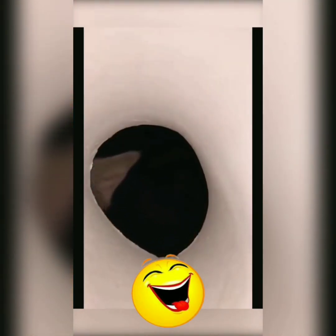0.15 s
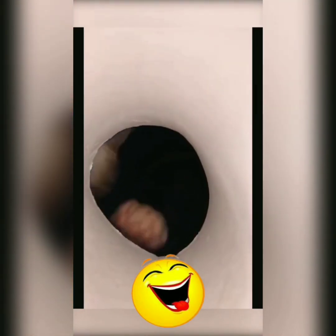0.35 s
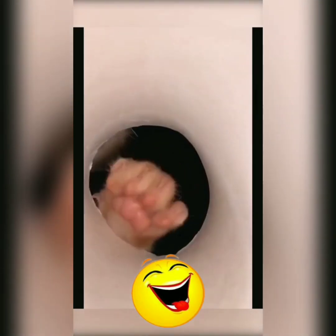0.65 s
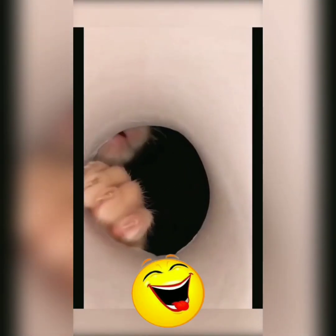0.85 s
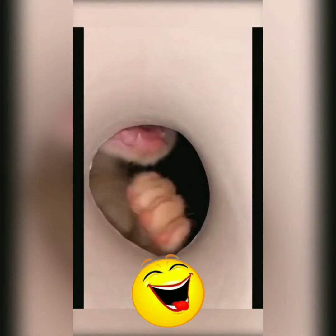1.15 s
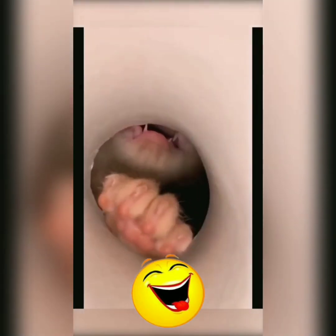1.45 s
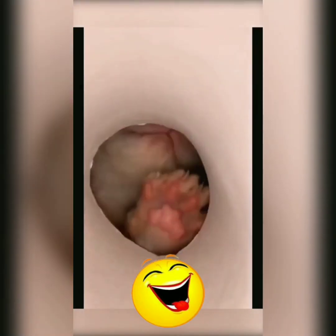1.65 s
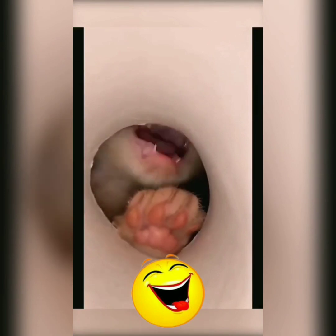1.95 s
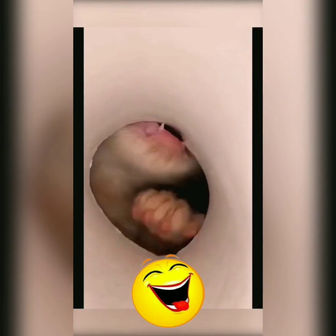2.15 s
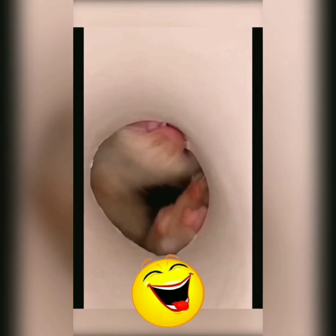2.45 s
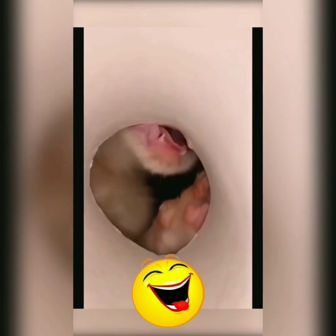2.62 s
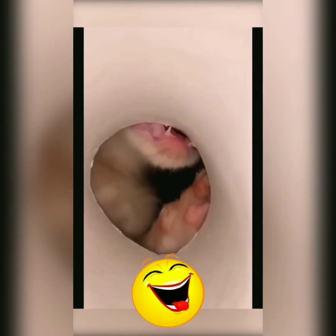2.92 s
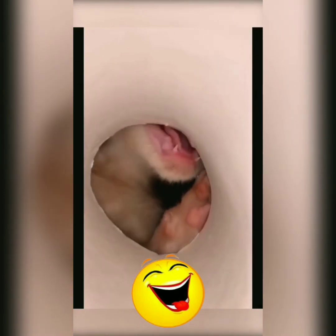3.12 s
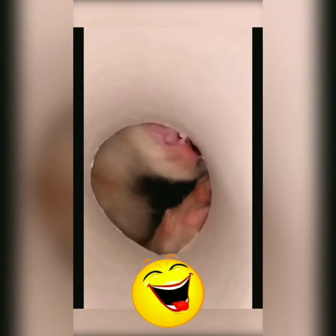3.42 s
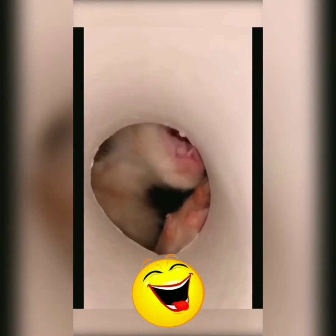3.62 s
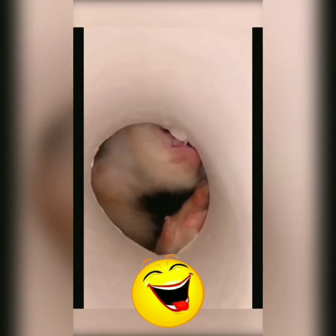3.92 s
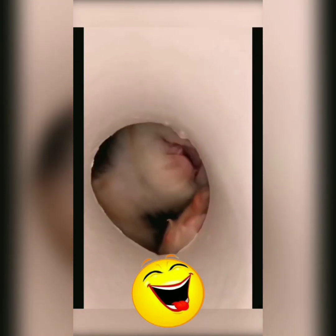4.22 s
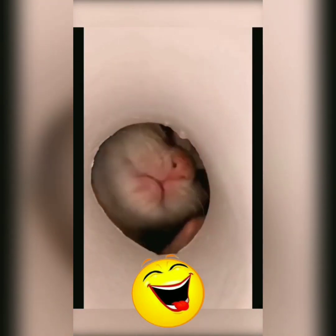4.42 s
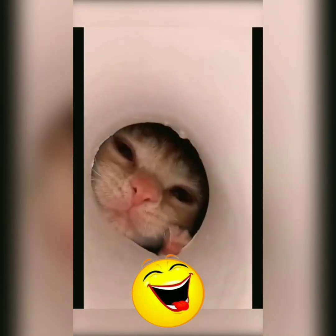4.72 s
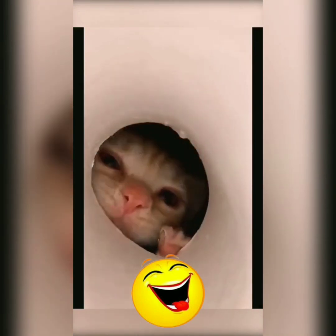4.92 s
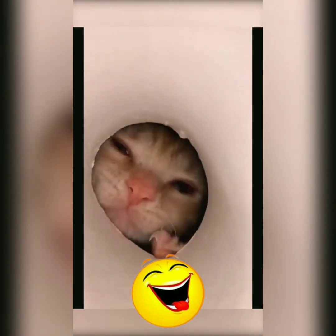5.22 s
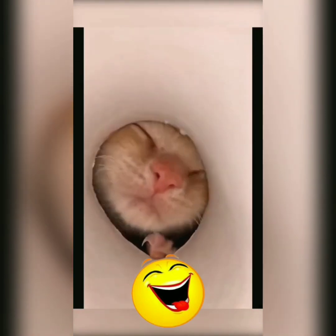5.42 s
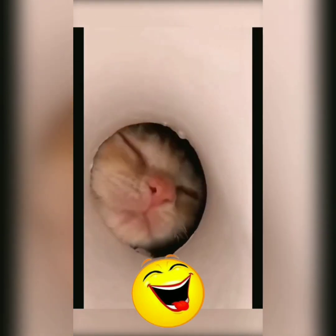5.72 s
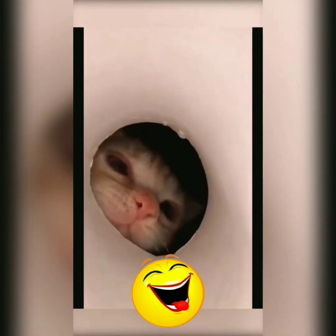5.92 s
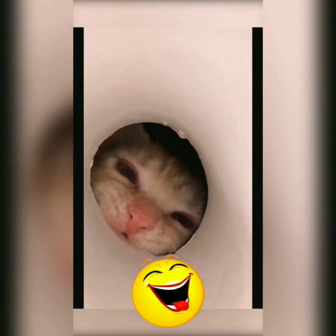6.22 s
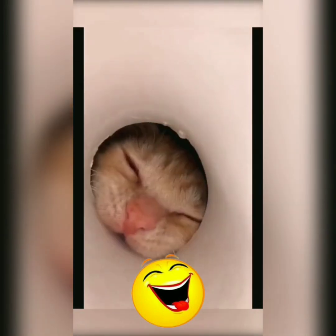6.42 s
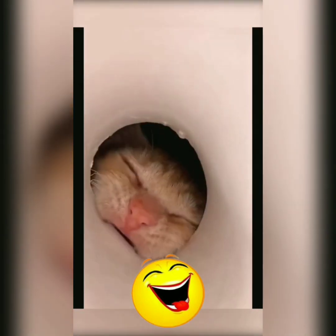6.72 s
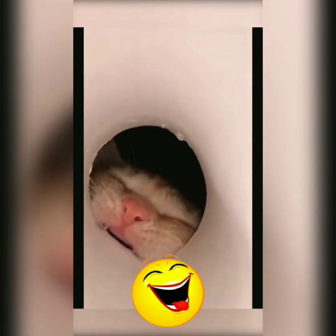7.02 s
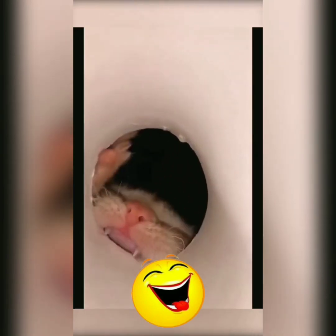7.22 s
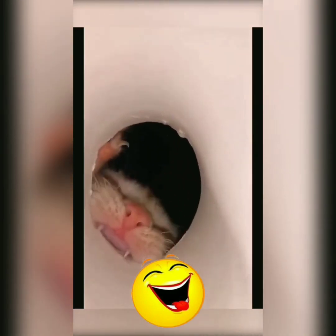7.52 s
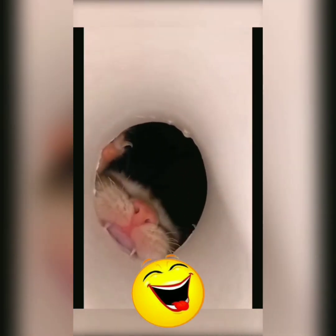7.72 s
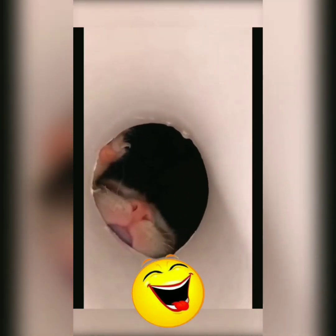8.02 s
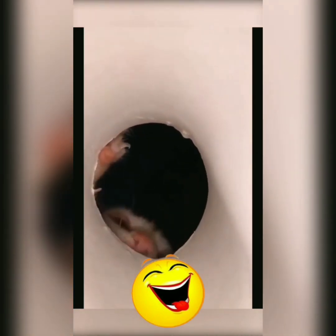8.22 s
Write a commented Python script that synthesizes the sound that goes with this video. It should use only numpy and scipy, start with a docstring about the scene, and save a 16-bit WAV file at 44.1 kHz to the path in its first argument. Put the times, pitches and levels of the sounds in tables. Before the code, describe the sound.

A dry, close stereo perspective in a nearly silent room, leaning right. A faint short rub opens; at 0.3 seconds the first snap clicks from stiff paper, followed by scattered light ticks and soft scraping. From 1.0 to 1.7 teeth catch harder, with rapid crunches and strong snaps around 1.5 to 1.65. Another tight pair cracks near 2.05. From 2.3 to 3.8 it is quieter: small clicks, fur hissing on the edge, dull soft bumps. A loud, low snap bursts at 3.98, with more until 4.15, then a crunch at 4.6. Around 5 there are mostly gentle strokes and bumps. Crisp snaps land at 5.7, 5.87, 6.3 and 6.4, with grainy rubbing between. A hard double snap hits at 7.2, another at 7.56, then gritty scraping at 7.7 and a quick flurry from 7.9 to 8.22, before faint rubbing ends it.

```python
"""A faint short rub in a quiet room, then sharp snaps: a kitten bites and claws at the edge of a hole
in a sheet of stiff paper, close to the microphone. Teeth and claws catch and slip off; each snap runs
through the sheet as a bending wave, treble first, bass last. A dragged tooth sticks and slips in a short
crunch. Between the snaps fur, muzzle and paws rub along the edge in short strokes with a grainy hiss and
small crackles, the sheet flexes with a low rumble, and soft pads and muzzle bump it dully."""
import sys
import numpy as np
from scipy import signal
from scipy.fft import rfft, irfft, next_fast_len
from scipy.io import wavfile
from scipy.ndimage import uniform_filter1d

SR = 44100
rng = np.random.default_rng(int(sys.argv[2]) if len(sys.argv) > 2 else 0)


def dump(signal):
    """Clip the signal to [-1, 1] and save it as 16-bit WAV at the path in sys.argv[1]."""
    limited = np.clip(np.atleast_2d(signal).T, -1, 1)
    pcm = np.round(limited * 32767).astype(np.int16)
    wavfile.write(sys.argv[1], SR, pcm)


N = 368676

# colour of the sheet's middle range, only its shape counts: (frequency [Hz], level [dB])
SHEET_COLOUR = [(250, -29), (340, -8.5), (430, -0.5), (800, -2.5), (1000, 2), (1250, -4), (1750, -11),
                (2530, -7.5), (3000, -17.5), (4000, -69)]
# colour of the cracking and hissing paper fibres: (frequency [Hz], level [dB])
FIBRE_COLOUR = [(2200, -42), (3200, -6), (4500, -2.5), (5030, 2), (5600, -4.5), (6300, -2.5), (7300, 0.5),
                (9200, -6.5), (11500, -0.5), (12300, 4), (13100, -11), (15500, -34)]
# colour of the sheet's slow flexing: (frequency [Hz], level [dB])
BENDING_COLOUR = [(22, -19), (60, 4.5), (225, 4.5), (290, 0.5), (350, -10.5), (600, -45)]
# how alike the two microphone ports hear snaps and crunches: (frequency [Hz], likeness [0-1])
SNAP_ALIKE = [(100, 0.78), (600, 0.43), (9000, 0.97)]

SNAP_SIZE, LEAD_SIZE = 4096, 768   # samples in one snap, and those ahead of its release
CREEP_S = 0.003   # time in which creeping and tearing grow or fade by a factor e
TRAVEL_S = 0.002115   # delay of bending waves at 1 kHz


def from_db(db):
    """Decibels to gain."""
    return 10 ** (np.asarray(db) / 20)


def rms_one(x):
    """Scale to rms 1."""
    return x / np.sqrt(np.mean(np.abs(x) ** 2) + 1e-20)


def in_time(rows):
    """Each column of a curve at every sample."""
    s, *columns = np.transpose(rows)
    return [np.interp(np.arange(N) / SR, s, c) for c in columns]


def bins(size):
    """Frequencies of a spectrum, kept above zero."""
    return np.maximum(np.fft.rfftfreq(size, 1 / SR), 1)


def at_hz(points, hz):
    """Read a table on a log-frequency axis."""
    f, value = np.transpose(points)
    return np.interp(np.log(hz), np.log(f), value)


def wander(shape, *spans):
    """Smooth random field of rms 1 that holds over the given number of steps along each axis."""
    field = rng.standard_normal(shape)
    for axis, span in enumerate(spans):
        steps = shape[axis]
        blur = np.exp(-(np.pi * np.fft.rfftfreq(steps) * span) ** 2)
        spectrum = rfft(np.swapaxes(field, axis, -1))
        field = np.swapaxes(irfft(spectrum * blur, steps), axis, -1)
    return rms_one(field)


def causal(db):
    """Minimum-phase response with this colour and unit power: nothing rings before its cause."""
    cepstrum = irfft(np.log(from_db(db)))
    half = len(cepstrum) // 2
    cepstrum[1:half] *= 2
    cepstrum[half + 1:] = 0
    return rms_one(np.exp(rfft(cepstrum)))


def ports(common, apart, likeness, hz, share=1):
    """Left and right spectra; the right port faces the sheet and hears its middle range louder."""
    # balance of the two microphone ports: (frequency [Hz], left minus right [dB])
    port_balance = [(380, 0.6), (650, -11), (2400, -8.5), (7000, -0.2)]
    alike = np.clip(at_hz(likeness, hz), 0, 1)
    sides = np.array([[1], [-1]])
    lean = from_db(sides * share * at_hz(port_balance, hz) / 2)
    apart = apart * np.sqrt((1 - alike) / (1 + alike))
    return (common + sides * apart) * lean / lean.mean(axis=0)


def travel(hz):
    """Bending waves travel as the root of frequency: treble arrives first, bass last."""
    return np.exp(-4j * np.pi * TRAVEL_S * np.sqrt(1000 * hz))


def air(level_db=-78.5):
    """The faint, slightly dull noise of the quiet room."""
    noise = uniform_filter1d(rng.standard_normal((2, N)), size=3)
    return from_db(level_db) * rms_one(noise)


def bumps(pad_hz=300, width_hz=260, length_s=0.0096):
    """Soft pads and muzzle press on the sheet: a dull swell of one low resonance, without any crack."""
    # soft bumps of paw or muzzle: (middle [s], level at the middle [dB])
    soft_bumps = [(2.616, -41), (3.056, -50), (3.114, -48), (5.031, -44.5), (5.688, -40.5), (6.773, -41)]
    t, hz = np.arange(N) / SR, bins(N)
    push = sum(from_db(db) * np.exp(-((t - s) / length_s) ** 2 / 2) for s, db in soft_bumps)
    resonance = 1 / (1 + 2j * (hz - pad_hz) / width_hz) ** 2
    ringing = rms_one(irfft(rfft(rng.standard_normal(N)) * resonance, N))
    return push * ringing * from_db([[1.5], [-1.5]])   # louder on the left


def contact():
    """Levels of scrape, hiss and rumble at every sample, in dB: the strokes on top of the leaning."""
    # between strokes the kitten leans on the sheet and its fur keeps stirring: (time [s], scrape [dB])
    leaning_levels = [(0.27, -110), (0.31, -60), (0.9, -60), (2.2, -50), (2.52, -67.5), (2.8, -63),
                      (4.3, -62.5), (4.55, -54.5), (4.82, -68.5), (4.93, -55), (6.05, -57), (6.9, -58),
                      (7.4, -66), (7.62, -51.5), (8.3, -59)]
    # a claw, tooth or cheek is drawn along the edge, levels at half length:
    # (half risen at [s], length [s], scrape [dB], hiss [dB], rumble [dB])
    edge_strokes = [(0.019, 0.029, -48, -46, -56.5), (0.299, 0.085, -49, -58, -86),
                    (0.478, 0.12, -55.5, -55, -61), (0.78, 0.16, -51.5, -52.5, -61),
                    (0.97, 0.18, -58, -52.5, -55), (1.28, 0.041, -48, -53.5, -51),
                    (1.342, 0.12, -45, -56, -42), (1.538, 0.13, -46.5, -50.5, -50),
                    (1.728, 0.059, -45, -48, -45), (1.825, 0.13, -54.5, -52.5, -51.5),
                    (2.006, 0.051, -38, -47, -37.5), (2.252, 0.059, -49.5, -40, -56),
                    (2.579, 0.029, -48, -50, -68), (2.656, 0.033, -43, -50, -47),
                    (3.023, 0.027, -51, -52, -59), (3.342, 0.12, -49.5, -46.5, -59),
                    (3.395, 0.12, -42, -44.5, -42.5), (3.641, 0.043, -51.5, -53, -57),
                    (4.408, 0.086, -44.5, -53, -62), (4.6, .115, -43, -49.5, -56.5),
                    (4.976, 0.25, -56, -60, -72), (5.21, 0.11, -41.5, -49.5, -49.5),
                    (5.336, 0.1, -48, -49, -54), (5.464, 0.19, -59.5, -47.5, -66),
                    (5.791, 0.11, -48.5, -64, -59), (6.171, 0.064, -53.5, -53.5, -74),
                    (6.303, 0.17, -37.5, -43, -49.5), (6.655, 0.12, -49, -46.5, -54.5),
                    (6.928, 0.042, -44, -47.5, -50), (6.984, 0.069, -43.5, -39.5, -78),
                    (7.195, 0.11, -41, -51, -42), (7.518, 0.083, -42.5, -54.5, -47.5),
                    (7.715, 0.016, -32, -30, -50), (7.74, 0.011, -28, -33.5, -39.5),
                    (7.892, 0.031, -35, -42, -35.5), (8.04, 0.14, -49, -58.5, -53.5),
                    (8.32, 0.016, -49, -77, -46)]
    attack_share = 0.42   # of its length: long strokes swell slowly
    sag_db_per_s, release_db_per_s = 33, 456   # through the stroke, and in addition after its length
    leaning_hiss_db, leaning_rumble_db = -3.5, -7   # relative to the leaning scrape
    t = np.arange(N) / SR
    leaning_db, = in_time(leaning_levels)
    power = from_db(leaning_db + np.array([[0], [leaning_hiss_db], [leaning_rumble_db]])) ** 2
    for s, length, *levels_db in edge_strokes:
        attack = attack_share * length
        near = slice(max(int((s - attack / 2) * SR), 0), int((s + length + .5) * SR))
        age = t[near] - s
        hold = np.clip(age / attack + .5, 0, 1)
        sag_db = sag_db_per_s * (age - length / 2)
        fade_db = sag_db + release_db_per_s * np.maximum(age - length, 0)
        power[:, near] += np.outer(from_db(levels_db), hold * from_db(-fade_db)) ** 2
    return 10 * np.log10(power)


def friction(colour_db, level_db, per_s, spread_db, smooth, judder_db, judder_s):
    """Tiny catches of fibres, uneven in size, over a smooth sliding noise; both ring in the sheet."""
    # how alike the two microphone ports hear the rubbing: (frequency [Hz], likeness [0-1])
    rub_alike = [(60, 0.55), (400, 0.13), (6500, 0.2), (12000, 0.72)]
    size = 2 * next_fast_len(N // 2 + SNAP_SIZE)
    caught = rng.random(N) < per_s / SR
    grains = rms_one(caught * from_db(spread_db * np.minimum(rng.exponential(1, N), 4)))
    # the contact sticks and frees itself in turn
    grip = from_db(judder_db * wander((size,), judder_s * SR)[:N])
    catches = grains * rng.choice([-1, 1], (2, N))
    drive = rms_one(grip * (catches + smooth * rng.standard_normal((2, N))))
    response = rms_one(rfft(irfft(causal(colour_db)), size))
    common, apart = rfft(drive * from_db(level_db), size) * response
    return irfft(ports(common, apart, rub_alike, bins(size)))[:, :N]


def pressed(x, load_db, split_hz=850, usual_db=-10, darken=0.27):
    """The more a stroke bends the sheet, the lower its scrape sounds; load_db is rumble over scrape."""
    low = signal.sosfiltfilt(signal.butter(2, split_hz, fs=SR, output="sos"), x)
    gain = from_db(darken * (load_db - usual_db))
    return low * gain + (x - low) / gain


def sliding(x, patch_db, patch_hz, hold_s, size=512):
    """As the contact slides along the edge, resonances of the sheet swell and fade."""
    hz, s, spectra = signal.stft(x, SR, nperseg=size)
    gain = from_db(patch_db * wander(spectra.shape[1:], patch_hz / hz[1], hold_s / s[1]))
    return signal.istft(spectra * rms_one(gain), SR, nperseg=size)[1][:, :N]


def rubbing(scrape_db, hiss_db, rumble_db, edge_hz=950, focus_db=4.0, hiss_tilt_db=3.0):
    """Claws scrape, fur hisses, the pushed sheet rumbles; the scrape favours the free edge's pitch."""
    hz = bins(SNAP_SIZE)
    focus = -focus_db * np.minimum(np.abs(np.log2(hz / edge_hz)), 1)
    scrape = friction(at_hz(SHEET_COLOUR, hz) + focus, scrape_db,
                      per_s=480, spread_db=2.6, smooth=0.55, judder_db=2.0, judder_s=0.006)
    hiss = friction(at_hz(FIBRE_COLOUR, hz) + hiss_tilt_db * np.log2(hz), hiss_db,
                    per_s=1000, spread_db=2.0, smooth=2.0, judder_db=3.0, judder_s=0.01)
    rumble = friction(at_hz(BENDING_COLOUR, hz), rumble_db,
                      per_s=200, spread_db=2.0, smooth=0.4, judder_db=3.0, judder_s=0.013)
    body = pressed(scrape, rumble_db - scrape_db) + rumble
    body = sliding(body, patch_db=4.0, patch_hz=103, hold_s=0.029)
    return body + sliding(hiss, patch_db=3.3, patch_hz=260, hold_s=.04)


def slip(decay_s, scatter):
    """Spectrum of a release: fibres creep, let go at once, then a scatter of small slips dies away."""
    creep_share = 0.28   # creep before the release, relative to the scatter after it
    t = (np.arange(SNAP_SIZE) - LEAD_SIZE) / SR
    grains = rng.standard_normal(SNAP_SIZE) * rng.exponential(1, SNAP_SIZE)
    before = rfft(grains * (t < 0) * np.exp(-np.abs(t) / CREEP_S))
    after = rfft(grains * (t > 0) * np.exp(-np.abs(t) / decay_s))
    return rfft(t == 0) + scatter * (creep_share * rms_one(before) + rms_one(after))


def snap_part(colour_db, share, decay_s, scatter):
    """A slip rings through one range of the sheet; its common part has the energy of 10 ms at rms 1."""
    hz, response = bins(SNAP_SIZE), causal(colour_db)
    common, apart = (rms_one(slip(decay_s, scatter) * response) for _ in range(2))
    apart = apart * rng.choice([1j, -1j])   # the ports hear different spots of the sheet, out of step
    return ports(common, apart, SNAP_ALIKE, hz, share) * np.sqrt(SR / 100)


def crackles(scrape_db):
    """Now and then the paper crinkles under the scrape: a small soft snap, each at its own pitch."""
    per_s, middle_hz = 16, 833
    least_db, spread_db = -4, 4   # lowest level relative to the scrape, and random rise above it
    fibre_db = -22   # fibre colour relative to the sheet's
    hz, out = bins(SNAP_SIZE), np.zeros((2, N + SNAP_SIZE))
    for start in np.flatnonzero(rng.random(N) < per_s / SR):
        pitch_hz = middle_hz * 2 ** rng.uniform(-0.42, 0.34)
        colour_db = at_hz(SHEET_COLOUR, hz) - 10 * np.minimum(np.log2(hz / pitch_hz) ** 2, 1)
        colour_db = np.maximum(colour_db, at_hz(FIBRE_COLOUR, hz) + fibre_db)
        sound = snap_part(colour_db, share=0.48, decay_s=CREEP_S, scatter=1) * travel(hz)
        db = scrape_db[start] + least_db + spread_db * min(rng.exponential(), 2)
        out[:, start:start + SNAP_SIZE] += from_db(db) * irfft(sound)
    return out[:, LEAD_SIZE:LEAD_SIZE + N]


def bitten(hz, pitch_hz, focus_db, bright_db, usual_hz=780):
    """Colour in dB: the place of the bite favours one octave either side; low bites are also duller."""
    focus = -focus_db * np.minimum(np.log2(hz / pitch_hz) ** 2, 1)
    octaves = np.log2(np.maximum(hz, usual_hz / 2) / usual_hz)
    return at_hz(SHEET_COLOUR, hz) + focus + bright_db * np.log2(pitch_hz / usual_hz) * octaves


def stick_slip(length, size, count=24):
    """Spectrum of an uneven run of slips with fine tearing, that stops when the tooth comes free."""
    slips_per_s, uneven, spread_db = 260, 0.45, 2.5
    grit = 0.64   # fine tearing, relative to the slips
    t = (np.arange(size) - LEAD_SIZE) / SR
    gaps = (1 + uneven * rng.uniform(-0.87, 1, count)) / slips_per_s
    at = np.cumsum(gaps) - gaps[0]
    strengths = from_db(spread_db * rng.standard_normal(count)) * (at <= length)
    slips = np.bincount(LEAD_SIZE + (at * SR).astype(int), strengths, size)
    outside_s = np.abs(t - np.clip(t, 0, length))   # time before or after the run
    tearing = rng.standard_normal(size) * np.exp(-outside_s / CREEP_S)
    return rms_one(rfft(slips)) + grit * rms_one(rfft(tearing))


def crunches(tilt_db=-1.5, focus_db=10.5, bright_db=20.5, modes_db=7.0):
    """Every slip of a run rings the same spot of the sheet, cracks a few fibres and flexes the edge."""
    # a tooth drags through the edge in a quick run of slips, level of the part common to both ports:
    # (treble arrives [s], length [s], rms level over that length [dB], pitch [Hz])
    tooth_drags = [(1.084, 0.025, -35.5, 820), (1.397, 0.029, -30.5, 643), (1.537, 0.024, -23.5, 660),
                   (1.572, 0.018, -21, 710), (1.63, 0.0057, -19, 700), (1.719, 0.032, -33.5, 712),
                   (2.013, 0.021, -34.5, 800), (2.179, 0.026, -35.5, 790), (3.899, 0.028, -32.5, 725),
                   (4.631, 0.017, -32, 670), (5.076, 0.044, -43.5, 850), (6.684, 0.047, -40, 1190),
                   (6.93, 0.03, -34, 600), (7.665, 0.032, -26.5, 657), (7.711, 0.017, -27.5, 1040),
                   (7.905, 0.012, -26, 756), (8.07, 0.0049, -21.5, 810)]
    crack_db, thump_db = -21.5, -15.5   # fibres and flexing, relative to the ringing
    size = 2 * SNAP_SIZE
    hz, out = bins(size), np.zeros((2, N + size))
    crack = from_db(crack_db) * causal(at_hz(FIBRE_COLOUR, hz))
    thump = from_db(thump_db) * causal(at_hz(BENDING_COLOUR, hz))
    for s, length, db, pitch_hz in tooth_drags:
        run = stick_slip(length, size)
        colour_db = bitten(hz, pitch_hz, focus_db, bright_db)
        # a dragged tooth sounds rounder than a snap
        colour_db = colour_db + tilt_db * np.log2(np.maximum(hz, pitch_hz / 2))
        heard = []
        for _ in range(2):
            ringing = causal(colour_db + modes_db * wander(hz.shape, 19.2))
            heard.append(rms_one(run * (ringing + crack + thump)))
        common, apart = heard
        sound = ports(common, apart * rng.choice([1j, -1j]), SNAP_ALIKE, hz) * travel(hz)
        start = int((s - TRAVEL_S / 4) * SR) - LEAD_SIZE   # at 16 kHz the delay is a quarter
        out[:, start:start + size] += from_db(db) * np.sqrt(length * SR) * irfft(sound)
    return out[:, :N]


def snaps(scrape_db, focus_db=11.5, modes_db=3.5, bright_db=13.0):
    """Each snap is a crack of fibres, a knock of the sheet and a thump as it springs back."""
    # a tooth or claw slips off the edge; rms levels over 10 ms of the part common to both ports:
    # (treble arrives [s], knock [dB], knock pitch [Hz], thump [dB], crack [dB])
    edge_snaps = [(0.2963,-25,1050,-40,-41.5), (0.387,-37.5,1120,-48.5,-45), (0.558,-46,610,-48,-61),
                  (0.756,-38,700,-60,-47), (0.9776,-32,690,-33,-69), (0.997,-33.5,700,-38,-59),
                  (1.16,-44,694,-46,-74), (1.3463,-32.5,756,-53,-43), (1.6249,-27.5,794,-31,-40.5),
                  (1.6397,-21,650,-20.5,-37), (1.9734,-28,595,-33,-36.5), (2.0524,-22.5,610,-31.5,-63),
                  (2.0651,-23,634,-35.5,-65), (2.141,-39,900,-72,-43.5), (2.297,-34.5,905,-59,-29),
                  (2.571,-34,970,-46,-34), (2.7564,-42,795,-39,-60), (2.7779,-36,800,-42.5,-51.5),
                  (2.856,-60,1000,-63,-50), (2.884,-47.5,920,-54,-47.5), (3.008,-72,1100,-79,-53),
                  (3.2312,-42,730,-55,-56), (3.258,-40.5,1160,-44,-46.5), (3.4019,-34.5,567,-39,-39.5),
                  (3.4309,-32,646,-37,-38.5), (3.565,-41,860,-45,-71), (3.8515,-34.5,560,-37,-61),
                  (3.8735,-35.5,890,-35.5,-49.5), (3.937,-42,915,-41.5,-48), (3.9839,-17.3,580,-34,-37),
                  (4.094,-28.5,780,-35,-50), (4.128,-26,854,-31.5,-38), (4.4155,-27,723,-41,-44.5),
                  (4.858,-37,700,-61,-50), (5.706,-20.5,737,-31,-30.5), (5.8673,-24.5,940,-33.5,-33),
                  (6.297,-24,830,-34.5,-39), (6.4173,-26.5,776,-29,-65), (6.9948,-33,630,-37,-60),
                  (7.2099,-18.5,804,-60,-30.5), (7.2173,-23,650,-24,-34), (7.276,-29,740,-32.5,-46.5),
                  (7.4927,-33.5,720,-32.5,-66), (7.5611,-22,815,-34.5,-41.5), (7.635,-42.5,820,-45,-46),
                  (7.882,-25.5,770,-36,-51), (7.985,-34,850,-32,-55), (8.028,-33,563,-28,-75),
                  (8.0599,-26,665,-39,-42.5), (8.081,-25,690,-39,-41.5), (8.1182,-23,805,-43,-39.5),
                  (8.132,-25.5,600,-41,-62), (8.144,-32,616,-44.5,-51), (8.2228,-19.5,860,-38,-38)]
    # as the kitten works round the hole, its snaps lean more or less to the right:
    # (time [s], share of the port balance [1])
    lean_share = [(1.64, 1.2), (3.98, 0.96), (4.1, 1.6), (5.7, 0.091), (5.87, 1.4), (7.2, 1.3)]
    hz, out = bins(SNAP_SIZE), np.zeros((2, N + SNAP_SIZE))
    for s, knock, pitch_hz, thump, crack in edge_snaps:
        modes = modes_db * wander(hz.shape, 9.0)   # each place wakes its own mix of modes
        share = np.interp(s, *np.transpose(lean_share))
        # a lone snap is short; one in the midst of hard scraping drags on
        drag = 1 + 5 * min(from_db(scrape_db[int(s * SR)] - knock), 1)
        knock_colour = bitten(hz, pitch_hz, focus_db, bright_db) + modes
        thump_colour = at_hz(BENDING_COLOUR, hz)
        crack_colour = at_hz(FIBRE_COLOUR, hz) + modes
        sound = from_db(knock) * snap_part(knock_colour, share, decay_s=0.003 * drag, scatter=0.58)
        sound += from_db(thump) * snap_part(thump_colour, share, decay_s=0.014, scatter=0.79)
        sound += from_db(crack) * snap_part(crack_colour, share, decay_s=0.0033 * drag, scatter=1.0)
        start = int((s - TRAVEL_S / 4) * SR) - LEAD_SIZE   # at 16 kHz the delay is a quarter
        out[:, start:start + SNAP_SIZE] += irfft(sound * travel(hz))
    return out[:, :N]


def scene():
    """The quiet room, soft bumps, rubbing, crackles and crunches, with the snaps in front."""
    scrape_db, hiss_db, rumble_db = contact()
    background = air() + bumps()
    rubs = rubbing(scrape_db, hiss_db, rumble_db) + crackles(scrape_db)
    return background + rubs + crunches() + snaps(scrape_db)


def record(dry):
    """A steep low-pass cuts the top above 16 kHz."""
    return signal.sosfilt(signal.cheby1(10, .1, 16000, fs=SR, output="sos"), dry)


dry = scene()
out = record(dry)
dump(out)
```